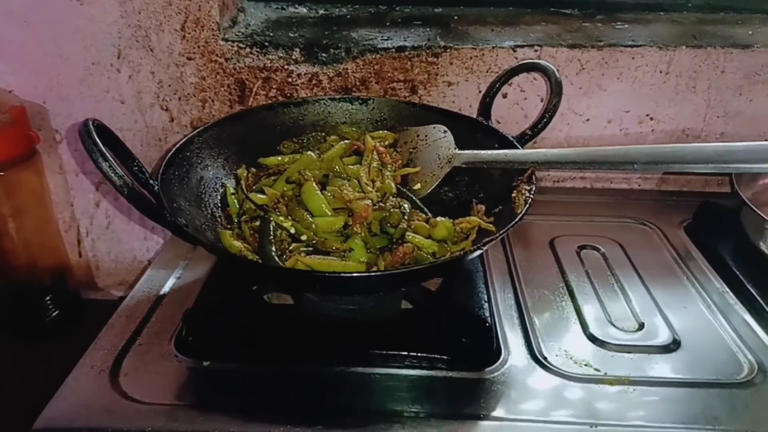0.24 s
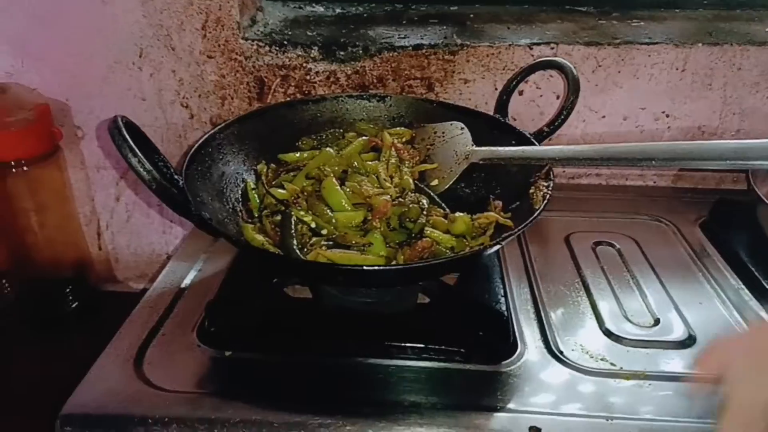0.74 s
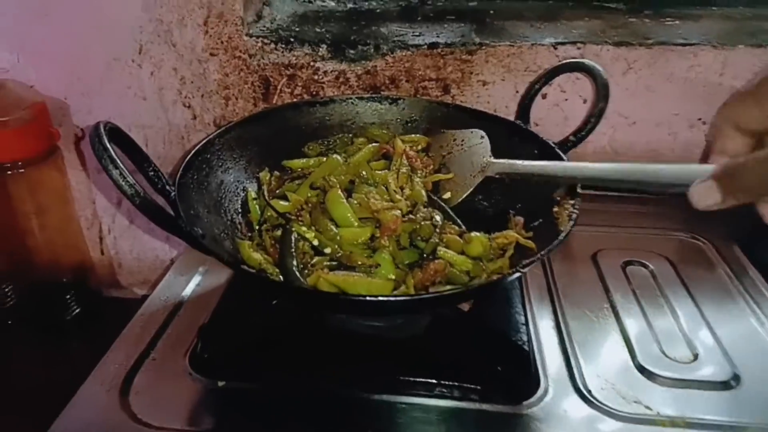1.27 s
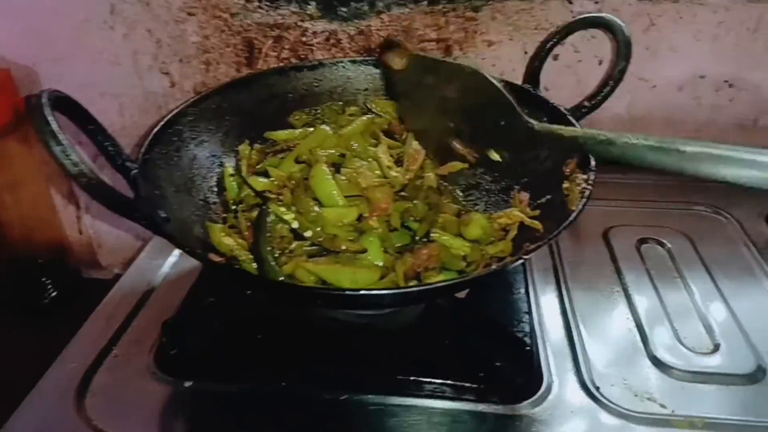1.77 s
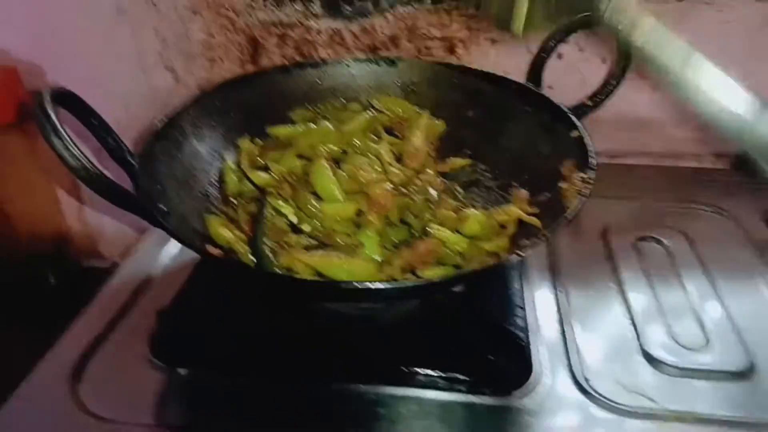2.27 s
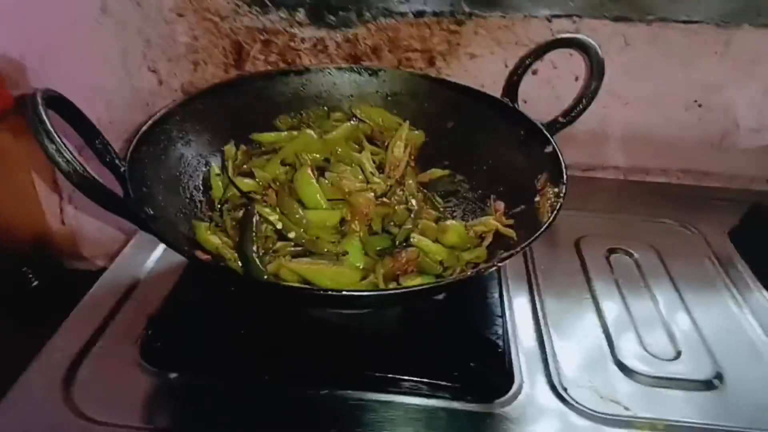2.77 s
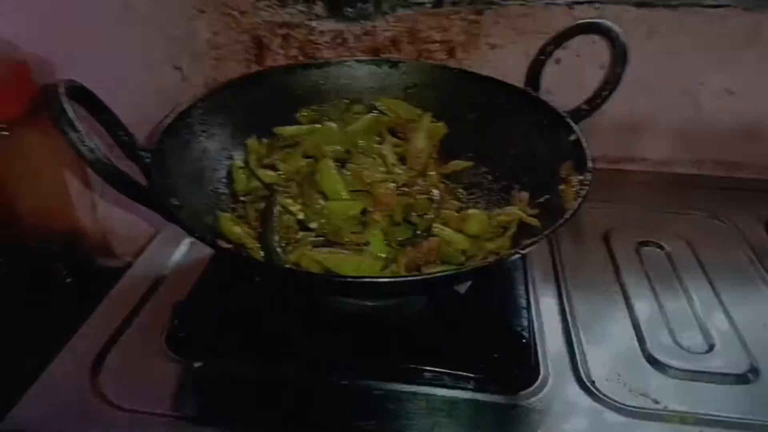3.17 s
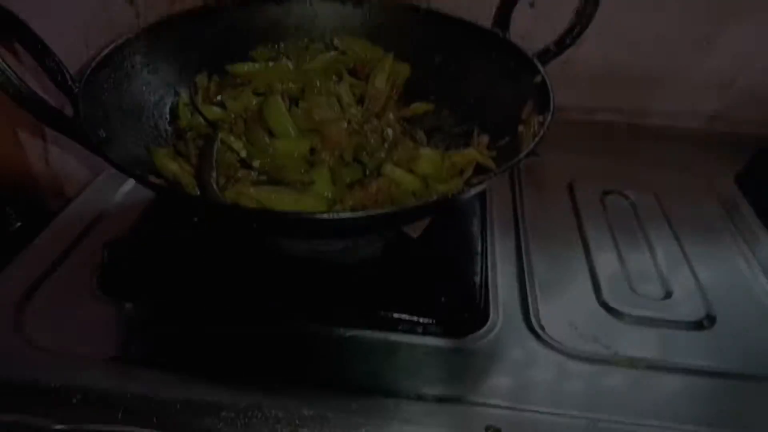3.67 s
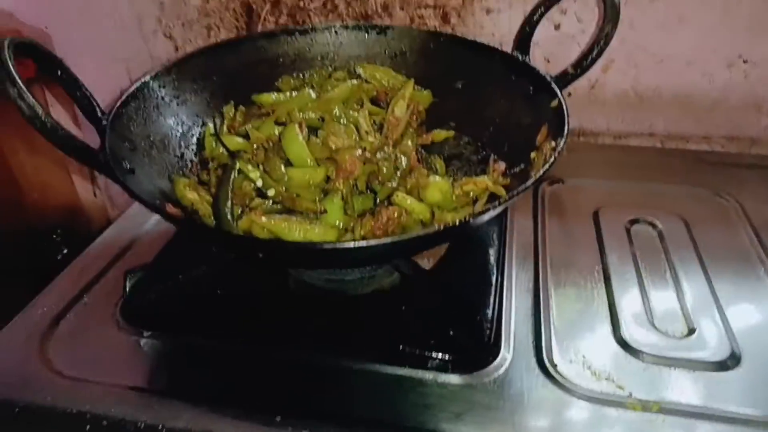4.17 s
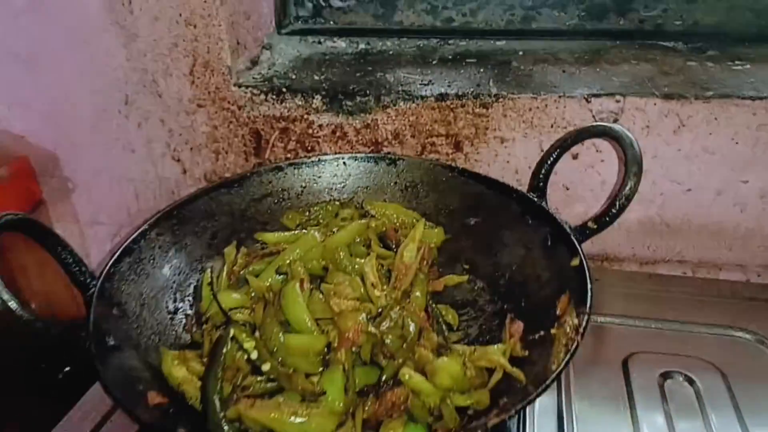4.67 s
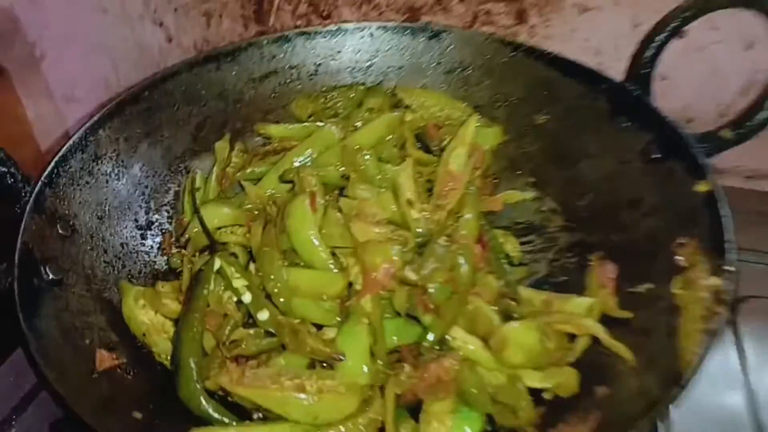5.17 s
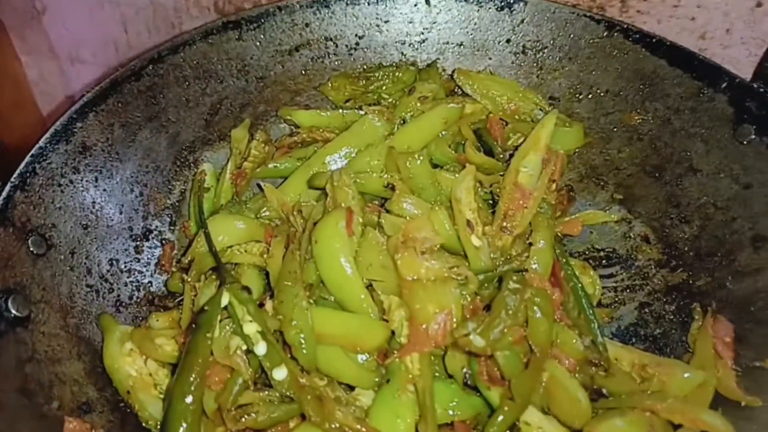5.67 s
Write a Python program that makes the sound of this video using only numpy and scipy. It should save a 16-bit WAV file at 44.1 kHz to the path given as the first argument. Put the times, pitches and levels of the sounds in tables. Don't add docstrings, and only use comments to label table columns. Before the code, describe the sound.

Soft, crisp frying fades slowly under low flame roar and chirping sparrows. After a faint scrape comes one loud spatula knock, then a quieter stretch with clean bird whistles. Two sharp knob cracks and a quick run of bright bouncing clacks break in, before the sizzle rises as the phone moves close. Low handling thuds continue; the room echo is short and clipped.

```python
import sys
import numpy as np
from scipy import signal
from scipy.fft import rfft, irfft, next_fast_len
from scipy.io import wavfile
from scipy.ndimage import uniform_filter1d

SR = 44100
rng = np.random.default_rng(int(sys.argv[2]) if len(sys.argv) > 2 else 0)


def generate_wav(sig):
    pcm = np.round(np.clip(np.atleast_2d(sig).T, -1, 1) * 32767).astype(np.int16)
    wavfile.write(sys.argv[1], SR, pcm)


def voltage_ratio(level):
    return 10 ** (np.asarray(level, float) / 20)


N = 260719
SIGN = np.array([[1], [-1]])
HIT_PORT_SHARE = .5
SPRAY_HZ = 8700.

# hz, level_db (per Hz)
FIZZ = [(2710, -40), (4600, -10.5), (5130, 1.5), (5450, 4.5), (6150, -4), (6450, 0), (7350, -14.5),
        (7800, -20), (8500, -27.5), (9250, -42.5), (10300, -20), (11200, -33), (12300, -24.5), (15100, -41),
        (16000, -44)]
# time_s, level_db
SIZZLE = [(0.0, -54), (.3, -50), (.5, -53.5), (1.09, -50.5), (1.23, -52.5), (1.5, -52.5), (2.0, -55),
          (2.86, -57), (3.22, -61), (3.74, -58.5), (4.15, -60.5), (4.61, -58), (5.13, -57), (5.5, -53),
          (5.91, -53)]
# time_s, level_db, half_width_s
SPITS = [(1.39, -71, .09), (1.65, -78, 0.5), (3.5, -85, .3), (5.1, -78, 0.29), (5.33, -73.5, 0.11),
         (5.45, -71, 0.1), (5.65, -68.5, 0.26), (5.88, -70, 0.13)]


def sizzle():
    size = next_fast_len(N)
    bursts = np.repeat(rng.exponential(size=size // 32 + 1), 32)[:size]
    grains = rng.standard_normal((2, size)) * voltage_ratio(1.3 * bursts)
    body_db = curve(SIZZLE)
    spray = swells(-85.5 + 0.89 * (body_db + 57.5), SPITS)
    body = voltage_ratio(body_db) * bed(FIZZ, 4410.0, SPRAY_HZ, grains, flicker_db=2.5, rate=32, count=8)
    return body + spray * bed(FIZZ, SPRAY_HZ, 15740., grains, flicker_db=3.5, rate=22, count=12)


# time_s, level_db, body_minus_treble_db, rattle_s
KNOCK = [
    (1.9990, -30, -10, .001),
    (1.9995, -10.5, -3, .0025),
    (2.0030, -16.5, 3, .004),
]
# hz, level_db
KNOCK_COLOUR = [(88, -33), (150, -45), (334, -8.5), (500, -17), (888, -14), (1240, -16.5), (1630, -10.5),
                (1950, -22), (2500, -14.5), (3350, -15.5), (4200, -20.5), (5150, -8), (6800, -19),
                (9820, -45), (12700, -28), (15100, -43), (16000, -54)]
# mode_hz, level_db, t60_s
SPATULA = [(160, -6, .3), (240, -2, .25), (291, 2, .35), (345, 4, .35), (400, 0, .25), (480, -3, .2),
           (560, -5, .2), (710, -5, .2), (877, -4, .2), (985, -7, .08), (1660, 1, .05), (2433, -5, .15),
           (3160, -6, .15), (3400, -5, .08), (4950, -9, .05), (6610, -13, .1), (1230, -7, 1), (2315, -9, 1),
           (3275, -7, 1)]
# hz, lead_rad
SPATULA_LEAD = [(300, -.2), (900, -.3), (1800, .3), (3300, 0), (5300, 3.7), (6500, 8.1), (12000, 28)]


def spatula_knock():
    return strike(KNOCK, KNOCK_COLOUR, SPATULA, SPATULA_LEAD,
                  ring_db=-15.5, wet_db=0.0, shorter=0.79, gate_s=0.3, pan_db=5.0)


# time_s, level_db, body_minus_treble_db, rattle_s
SNAP_1 = [
    (4.1640, -31.5, 6, 0.0037),
    (4.1664, -12.5, -4, 0.0017),
    (4.1697, -13, -0.5, 0.001),
    (4.1755, -30.5, 3, 0.0019),
    (4.2262, -20.5, 2.5, 0.002),
    (4.2520, -35, 3, 0.0072),
]
SNAP_2 = [
    (4.4660, -32.5, 7, 0.002),
    (4.4688, -19.5, -2.5, 0.0032),
    (4.4760, -31, 2, 0.0019),
    (4.4930, -24.5, 3.5, 0.0036),
]
# hz, level_db
SNAP_1_COLOUR = [(88, -39), (150, -28), (280, -4), (480, -16.5), (624, -22.5), (960, -18), (1340, -22.5),
                 (2300, -19.5), (2900, -15), (3250, -17), (3620, -11), (4080, -26.5), (5460, -10),
                 (6800, -24), (12000, -46.5), (16000, -40)]
SNAP_2_COLOUR = [(88, -49), (150, -17), (280, -24), (361, -5.5), (624, -17), (837, -8), (1060, -14),
                 (2650, -14.5), (3350, -10.5), (4860, -15.5), (5300, -1.5), (6300, -15), (7300, -16),
                 (8700, -33), (14000, -30), (16000, -38)]
# mode_hz, level_db, t60_s
KNOB_1 = [(283, 2, .2), (343, -1, .2), (964, -10, .05), (1025, -18, .12), (1803, -9, .1), (2570, -17, .1),
          (2907, -15, .04), (10800, -24, .06), (3690, -7, .35), (5190, -7, .04), (5430, -4, .05),
          (5529, -8, .06), (6239, -9, .05), (6310, -8, .07)]
KNOB_2 = [(340, -9, .1), (362, -6, .1), (1023, -16, .15), (1814, -10, .07), (2492, -11, .03),
          (3273, -12, .04), (4274, -18, .1), (5292, -6, .05), (5992, 0, .035), (6293, -2, .06),
          (7063, -18, .1), (8193, -22, .06)]
# hz, lead_rad
KNOB_LEAD = [(300, .1), (900, .3), (1800, 3), (3300, 3.6), (5300, 4.8), (6300, 6.1), (9000, 6.1)]


def knob_snaps():
    first = strike(SNAP_1, SNAP_1_COLOUR, KNOB_1, KNOB_LEAD,
                   ring_db=-5.0, wet_db=-2.0, shorter=0.48, gate_s=0.17, pan_db=6.0)
    second = strike(SNAP_2, SNAP_2_COLOUR, KNOB_2, KNOB_LEAD,
                    ring_db=0.0, wet_db=0.0, shorter=0.45, gate_s=0.26, pan_db=4.0)
    return first + second


# time_s, level_db, body_minus_treble_db, rattle_s
CLACK_1 = [
    (4.5175, -17, -11, 0.0033),
    (4.5200, -18, -20, 0.003),
    (4.5345, -21.5, 4.5, 0.0031),
]
CLACK_2 = [
    (4.5552, -19, -23, 0.0048),
    (4.5605, -18.5, -22, 0.0014),
    (4.5665, -20, -7, 0.0023),
    (4.5750, -18.5, -2.5, 0.0015),
    (4.5865, -30.5, 0, 0.0027),
    (4.5935, -23, -13, 0.0013),
    (4.6000, -29, 0, 0.0011),
    (4.6290, -25, -33, 0.00081),
]
# mode_hz, level_db, t60_s
GRATE_1 = [(347, -11, .2), (713, -6, .2), (835, -7, .2), (1050, -16, .9), (1813, -11, .1), (3386, -14, .1),
           (4366, -12, .15), (5178, -8, .08), (5410, 4, .16), (5972, -12, .1), (6320, -1, .13),
           (6360, -8, .1), (7052, -18, .12), (10900, -30, .06)]
GRATE_2 = [(360, -6, .5), (713, -8, .17), (835, -8, .17), (1000, -8, .9), (2266, -14, .15), (3435, -12, .1),
           (5321, -9, .12), (5410, -6, .15), (5972, -3, .1), (6023, -7, .1), (6245, -6, .1),
           (6320, -2, .09), (7052, -8, .11), (10900, -30, .06)]


def spring_bounces():
    first = strike(CLACK_1, SNAP_2_COLOUR, GRATE_1, KNOB_LEAD,
                   ring_db=-1.0, wet_db=3.0, shorter=0.8, gate_s=0.2, pan_db=0.5)
    second = strike(CLACK_2, SNAP_2_COLOUR, GRATE_2, KNOB_LEAD,
                    ring_db=-0.5, wet_db=1.0, shorter=0.7, gate_s=0.27, pan_db=3.0)
    return first + second


# time_s, level_db, body_minus_treble_db, rattle_s
LIFT = [
    (1.287, -58, -6, 0.015),
    (1.2965, -40, -10, 0.007),
    (1.394, -42, -34, 0.006),
    (1.403, -40, -32, .005),
    (1.9955, -31, -30, .004),
]
# time_s, level_db, body_minus_treble_db, rattle_s
TICKS = [(.190, -48, -7, 0.0072), (.7538, -21, -24, 0), (.757, -42, -24, .004), (1.3595, -23, -26, 0),
         (1.496, -47, -30, .002), (1.573, -45, -30, 0.003), (2.5426, -26, -26, 0), (2.552, -41, -26, .001),
         (2.569, -41, -24, .001), (4.0110, -28, -24, 0), (4.0205, -41, -26, .001), (5.44, -54, -20, 0.0014),
         (5.648, -43.5, -22, 0.0024), (5.866, -50, -26, 0.0056)]
# hz, level_db (per Hz)
TICK_COLOUR = [(500, -30), (3300, -19), (4400, -18), (5200, -5), (6600, -8), (8500, -18), (10500, -27),
               (13000, -45)]
# mode_hz, level_db, t60_s
PAN_RIM = [(1000, 2, .22), (1750, 2, .18), (1862, 0, .15), (2730, -5, .08), (3450, -7, .07),
           (4250, -1, .09), (4635, -5, .08), (5265, 5, .07), (6074, -6, .06)]
# hz, lead_rad
PAN_LEAD = [(300, .1), (900, -.2), (1800, .9), (3300, 1.9), (5300, 2.9), (9000, 6.3)]
SIZZLE_LEAD = [(1000, 0), (2000, -1), (4500, -1.3), (5500, -2.1), (7000, -2.5)]


def pan_touches():
    lift = strike(LIFT, FIZZ, PAN_RIM, PAN_LEAD,
                  ring_db=5, wet_db=-4, shorter=.5, gate_s=.1, pan_db=3, knee_hz=3300)
    ticks = strike(TICKS, TICK_COLOUR, PAN_RIM, SIZZLE_LEAD,
                   ring_db=-12, wet_db=-5, shorter=.5, gate_s=.12, pan_db=0)
    return lift + ticks


def strike(blows, colour, modes, lead, ring_db, wet_db, shorter, gate_s, pan_db, knee_hz=1200):
    size = 16384
    out, t, hz = np.zeros((2, N + size)), np.arange(size) / SR, np.fft.rfftfreq(size, 1 / SR)
    crack, rings = causal(colour, size), ringing(modes, size)
    shading_db = pan_db + HIT_PORT_SHARE * at(PORTS, hz)
    ports = np.exp(1j * SIGN * at(lead, hz) / 2) * voltage_ratio(SIGN * shading_db / 2)
    walls = voltage_ratio(wet_db) * rfft(room(size, shorter, gate_s))
    for s, top_db, body_db, rattle_s in blows:
        rise = 1 - np.exp(-t / (3e-5 + .05 * abs(rattle_s)))
        shape = np.exp(-t / max(rattle_s, 2e-5))
        energy = np.sum(shape ** 2)
        rattle = rfft(rng.standard_normal(size) * shape)
        rattle = rattle * np.sqrt(energy / uniform_filter1d(np.abs(rattle) ** 2, size=200))
        turn = np.exp(2j * np.pi * rng.random(len(modes)) * (s > blows[1][0]))
        mode_gain = voltage_ratio(ring_db + 1.2 * rng.standard_normal(len(modes))) * turn
        struck = mode_gain @ rings * np.sqrt(energy)
        push = voltage_ratio(top_db + body_db / (1 + (hz / knee_hz) ** 4))
        heard = push * (rattle * crack * (ports + walls) + struck * (ports + voltage_ratio(-5) * walls))
        i = int(s * SR)
        out[:, i:i + size] += irfft(heard, size) * rise * voltage_ratio(-20 * (t / gate_s) ** 3)
    return signal.sosfilt(signal.butter(3, 130, "high", fs=SR, output="sos"), out[:, :N])


def causal(colour, size):
    cepstrum = irfft(np.log(voltage_ratio(at(colour, np.fft.rfftfreq(size, 1 / SR)))), size)
    cepstrum[1:size // 2] *= 2
    cepstrum[size // 2:] = 0
    crack = np.exp(rfft(cepstrum))
    return crack / np.sqrt(np.mean(np.abs(crack) ** 2))


def ringing(modes, size):
    t, (hz, db, t60) = np.arange(size) / SR, np.array(modes).T[:, :, None]
    twin_hz = hz * (1 + .013 * np.cos(hz))
    twin_db = np.where(t60 > .5, -24.5, -7.5)
    tones = np.sin(2 * np.pi * hz * t) + voltage_ratio(twin_db) * np.sin(2 * np.pi * twin_hz * t)
    build_up = 1 - np.exp(-t * hz / 2.2)
    rings = voltage_ratio(-60 * t / np.clip(t60, .01, 1)) * tones * build_up
    return rfft(voltage_ratio(db) * rings / np.sqrt(np.sum(rings ** 2, axis=1, keepdims=True)))


# hz, t60_s
ROOM_T60 = [(100, 1), (400, 0.7), (1500, 0.56), (6000, 0.28), (12000, 0.026)]


def room(size, shorter, gate_s):
    t, hz = np.arange(size) / SR, np.fft.rfftfreq(size, 1 / SR)
    spectrum = pair(rng.standard_normal((2, size)), HIT_PORT_SHARE)
    tail = np.zeros((2, size))
    for low_hz in 40 * 2. ** np.arange(10):
        band = irfft(spectrum * ((hz >= low_hz) & (hz < 2 * low_hz)), size)
        decay = voltage_ratio(-60 * t / (shorter * at(ROOM_T60, 0.76 * low_hz)))
        tail += band * decay * (1 - np.exp(-t * low_hz / 2.0))
    tail = tail * voltage_ratio(-20 * (t / gate_s) ** 3)
    return tail / np.sqrt(np.sum(tail ** 2) / 2)


# start_s, length_s, first_hz, last_hz, level_db
CHIRPS = [(0.195, 0.057, 5180, 4900, -50), (0.228, 0.071, 4100, 3860, -43), (0.197, 0.088, 2620, 2270, -63),
          (0.659, 0.1, 3020, 2860, -45.5), (0.698, 0.061, 4100, 3890, -42.5),
          (0.739, 0.076, 3680, 3330, -43), (0.751, 0.025, 5280, 5020, -42), (0.952, 0.087, 2986, 3110, -49),
          (0.971, 0.06, 4080, 3980, -43), (1.005, 0.08, 3745, 3390, -43.5), (1.117, .025, 3380, 3280, -56),
          (5.57, 0.042, 3530, 3500, -57), (5.601, 0.05, 2730, 2690, -62), (2.44, .03, 4650, 4930, -64),
          (2.909, 0.071, 3404, 3310, -50), (2.946, 0.044, 4800, 4600, -55.5)]
# start_s, length_s, level_db
PEEPS = [(0.36, 0.11, -63.5), (.49, 0.051, -66), (1.76, 0.054, -63), (1.84, 0.046, -68), (2.472, 0.1, -71),
         (2.642, 0.12, -71.5), (2.845, 0.0172, -75), (2.97, 0.047, -63.5), (5.338, 0.017, -67),
         (5.385, 0.063, -66)]
# start_s, length_s, pitch_hz, level_db, left_minus_right_db
HOOTS = [(0.211, 0.036, 341, -52.5, 20), (0.508, 0.044, 331, -47, 10), (.617, 0.038, 1008, -58.5, -8),
         (.84, 0.022, 815, -59.5, 10), (2.945, 0.054, 2320, -60, 11), (3.069, 0.016, 2330, -57.5, -7),
         (3.267, 0.073, 2400, -63.5, -6), (3.266, 0.046, 796, -63, -9), (3.428, 0.026, 793, -57.5, -5),
         (4.934, 0.097, 1058, -64, 14), (5.523, 0.064, 794, -57, -15), (5.6, 0.088, 1275, -65.5, 12)]


def birds():
    out = np.zeros((2, N))
    wobble = 1 + .034 * walk(500)
    notes = [(*row, 0.5) for row in CHIRPS]
    notes += [(s, length, 3780, 3690, db, -24.5) for s, length, db in PEEPS]
    notes += [(s, length, hz, hz * (1 - 0.017), db, pan_db) for s, length, hz, db, pan_db in HOOTS]
    for s, length, first_hz, last_hz, db, pan_db in notes:
        i, u = int(s * SR), np.linspace(0, 1, int(length * SR))
        pitch_hz = (first_hz + (last_hz - first_hz) * u) * wobble[i:i + len(u)]
        phase = 2 * np.pi * np.cumsum(pitch_hz) / SR
        out[:, i:i + len(u)] += voltage_ratio(db + SIGN * pan_db / 2) * np.sin(np.pi * u) ** 0.45 * np.sin(phase)
    out = out * voltage_ratio(3.2 * walk(330))
    echo = signal.fftconvolve(out, room(size=8192, shorter=0.49, gate_s=0.15), axes=1)[:, :N]
    return voltage_ratio(-7) * out + voltage_ratio(-5) * echo


# start_s, length_s, first_hz, last_hz, arch_hz, level_db
WHISTLES = [
    (2.336, 0.077, 4950, 5740, 247, -54.5),
    (2.838, 0.039, 5770, 5720, 558, -50),
]


def whistles():
    out, lag_rad, pan_db = np.zeros((2, N)), 1.3, -2.0
    for s, length, first_hz, last_hz, arch_hz, db in WHISTLES:
        i, u = int(s * SR), np.linspace(0, 1, int(length * SR))
        pitch_hz = first_hz + (last_hz - first_hz) * u + arch_hz * np.sin(np.pi * u)
        phase = 2 * np.pi * np.cumsum(pitch_hz) / SR
        note = np.sin(np.pi * u) ** 0.21 * np.sin(phase - SIGN * lag_rad / 2)
        out[:, i:i + len(u)] += voltage_ratio(db + SIGN * pan_db / 2) * note
    echo = signal.fftconvolve(out, room(size=8192, shorter=0.77, gate_s=.1), axes=1)[:, :N]
    return out * voltage_ratio(2.1 * walk(150)) + voltage_ratio(-7.0) * echo


# time_s, level_db, half_width_s
THUDS = [(0.79, -52.5, 0.065), (1.08, -56, 0.059), (2.06, -56, .07), (2.16, -60, 0.043),
         (3.651, -50.5, 0.041), (3.73, -46.5, 0.063), (4.005, -56, .05), (4.105, -50, 0.053),
         (4.19, -54, 0.061), (4.5, -60, 0.046), (4.59, -48, 0.068), (4.695, -54.5, .07),
         (5.524, -48, 0.088), (5.645, -56, .07)]
# time_s, level_db, half_width_s, pitch_hz
RUBS = [(.4, -66, 0.81, 224), (0.639, -57, 0.059, 137), (0.929, -58, 0.069, 150), (1.087, -52, 0.059, 96.5),
        (1.4, -61, 0.08, 147.6), (2.085, -34, 0.063, 161.3), (2.15, -37, 0.045, 149),
        (2.101, -55, 0.17, 103), (2.409, -58.5, 0.03, 150), (3.4, -57, .06, 153), (3.691, -54.5, 0.047, 94),
        (3.816, -55, 0.1, 130), (4.229, -50, .08, 152), (4.55, -34, 0.036, 140), (4.501, -51, 0.048, 85),
        (4.61, -46, 0.071, 90), (5.069, -57, 0.064, 151), (5.156, -48.5, 0.045, 149.4),
        (5.172, -49.5, 0.059, 98), (5.583, -48.5, 0.11, 97.5), (5.69, -58, 0.056, 95),
        (5.81, -50.5, 0.03, 142)]
# hz, level_db (per Hz)
RUMBLE = [(12, -42), (20, -28), (38, 4), (70, -1.5), (92, -2), (119, -0.5), (146, 3), (200, -6.5),
          (260, -41), (440, -120)]


def hand_on_case():
    noise, noisy_db = rng.standard_normal((2, next_fast_len(N))), -6.5
    thud = swells(-79, [(s, db + noisy_db, half_s) for s, db, half_s in THUDS])
    traffic_db = -65 - 0.03 * np.arange(N) / SR
    rub = swells(traffic_db, [(s, db + noisy_db, half_s) for s, db, half_s, _ in RUBS])
    notes = booms([*RUBS, *[(*row, 52) for row in THUDS]])
    return (notes + thud * bed(RUMBLE, 24.0, 66.0, noise, flicker_db=2.0, rate=2.85)
            + rub * bed(RUMBLE, 75., 200., noise, flicker_db=3.5, rate=23))


def booms(rows):
    out = np.zeros((2, N))
    for s, db, half_s, hz in rows:
        i, t, gain = bell(s, db - 4.5, half_s)
        out[:, i] += np.sqrt(2) * gain * np.cos(2 * np.pi * hz * t - 0.11 * SIGN)
    return out


# time_s, level_db
ROAR = [(0.0, -61.5), (1.3, -62), (1.9, -63), (2.3, -71.5), (3.56, -65), (4.4, -67), (5.6, -68.5),
        (5.91, -69)]
# time_s, roar_db, air_db, half_width_s
ANSWERS = [
    (2.158, -51, -77, 0.16),
    (4.27, -34, -55.5, 0.043),
    (4.649, -43, -61, 0.12),
]
# hz, level_db (per Hz)
QUIET = [(120, -30), (200, 0), (308, -3.5), (352, 0.5), (422, -10), (677, -12.5), (803, -11), (881, -14.5),
         (1000, -15.5), (1940, -16), (2300, -14.5), (2980, -19), (3360, -14.5), (4250, -17.5), (4600, -15),
         (5980, -42), (10100, -120)]


def roar_and_air():
    noise = rng.standard_normal((2, next_fast_len(N)))
    roar = swells(curve(ROAR), [(s, db, half_s) for s, db, _, half_s in ANSWERS])
    air = swells(-71.5, [(s, db, half_s) for s, _, db, half_s in ANSWERS])
    return (roar * bed(QUIET, 200., 450., noise, flicker_db=2.0, rate=14)
            + air * voltage_ratio(9.0) * bed(QUIET, 450., 4600., noise, flicker_db=3.5, rate=8.8, count=5))


def far_chorus():
    noise = rng.standard_normal((2, next_fast_len(N)))
    return voltage_ratio(-72) * bed(QUIET, 3650., 3920., noise, flicker_db=3.0, rate=16)


def bed(colour, lo_hz, hi_hz, noise, flicker_db, rate, count=3):
    size = noise.shape[1]
    hz = np.fft.rfftfreq(size, 1 / SR)
    spectrum = pair(noise) * voltage_ratio(at(colour, hz))
    edges = np.geomspace(lo_hz, hi_hz, int(count * np.log2(hi_hz / lo_hz)) + 2)
    out = np.zeros((2, N))
    for a, b in zip(edges, edges[1:]):
        band = irfft(spectrum * ((hz >= a) & (hz < b)), size)[:, :N]
        out += band * voltage_ratio(flicker_db * walk(rate))
    return out / np.sqrt(np.mean(out ** 2))


# hz, likeness (0 to 1)
LIKENESS = [(60, 0.88), (130, 0.9), (290, 0.82), (640, 0.5), (1410, 0.05), (4000, 0.1), (5500, 0.3),
            (7000, .3), (8000, .05), (15000, 0.05)]
# hz, left_minus_right_db
PORTS = [(60, -1.5), (200, 0.5), (700, 0), (2380, -2), (4400, -3.5), (6900, 1), (7900, -19.5), (9000, -32),
         (10300, -15), (12000, -12), (15000, -7)]


def pair(noise, share=1.):
    mid, side = rfft(noise)
    hz = np.fft.rfftfreq(noise.shape[1], 1 / SR)
    like = np.clip(at(LIKENESS, hz), -.99, .99)
    both = mid * np.sqrt(1 + like) + side * np.sqrt(1 - like) * SIGN
    return both * voltage_ratio(share * SIGN * at(PORTS, hz) / 2) * np.exp(.5j * SIGN * at(SIZZLE_LEAD, hz))


def walk(rate):
    k = int(SR / rate)
    held = np.repeat(rng.standard_normal(N // k + 1), k)
    return 1.42 * uniform_filter1d(uniform_filter1d(held, k), k)[:N]


def at(table, hz):
    table = np.array(table)
    return np.interp(np.log(np.maximum(hz, 1)), np.log(table[:, 0]), table[:, 1])


def curve(table):
    return np.interp(np.arange(N) / SR, *np.transpose(table))


def swells(floor_db, rows):
    power = voltage_ratio(floor_db) ** 2 * np.ones(N)
    for row in rows:
        i, _, gain = bell(*row)
        power[i] += gain ** 2
    return np.sqrt(power)


def bell(s, db, half_s):
    half_s = np.clip(half_s, .02, .5)
    i = np.arange(max(int((s - 2 * half_s) * SR), 0), min(int((s + 2 * half_s) * SR), N))
    t = i / SR - s
    return i, t, voltage_ratio(db - 20 * (t / half_s) ** 2)


def scene():
    stove = sizzle() + spatula_knock() + knob_snaps() + spring_bounces() + pan_touches()
    outside = birds() + whistles() + far_chorus()
    return stove + outside + hand_on_case() + roar_and_air()


def low_pass(x):
    return signal.sosfilt(signal.butter(12, 16310, fs=SR, output="sos"), x)


def record(dry):
    top = signal.ellip(10, .3, 80, 15750, fs=SR, output="sos")
    dip = signal.lfilter(*signal.iirpeak(4250, 9, fs=SR), dry)
    mix = signal.sosfilt(top, dry - 0.6 * dip)
    return low_pass(mix)


dry = scene()
out = record(dry)
generate_wav(out)
```